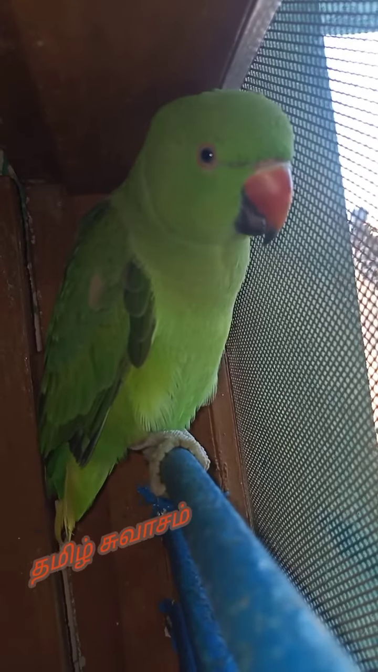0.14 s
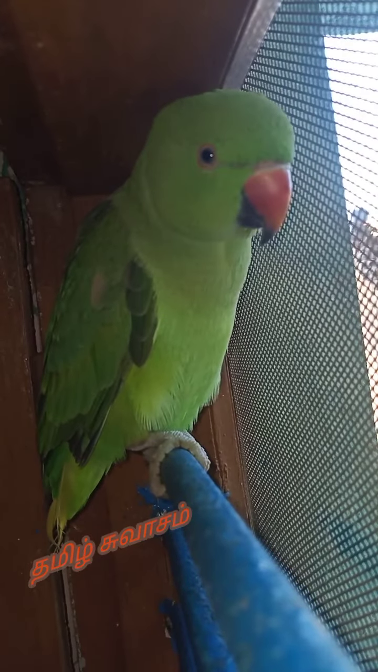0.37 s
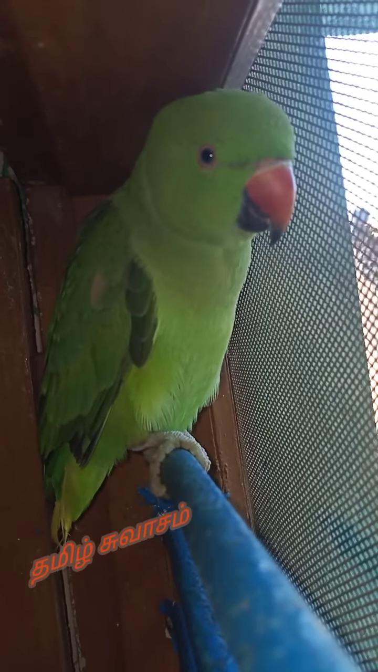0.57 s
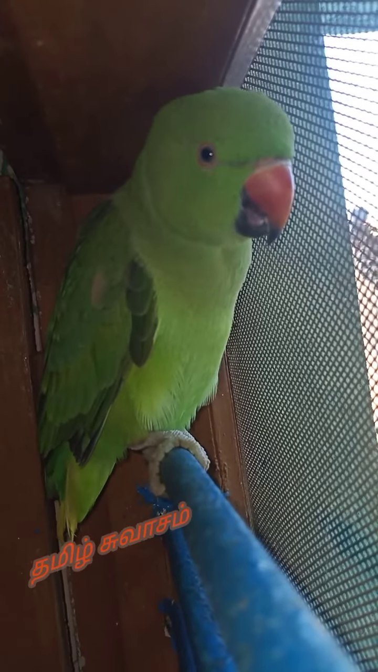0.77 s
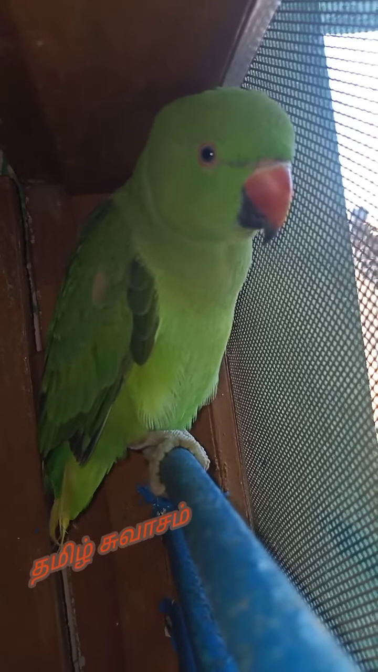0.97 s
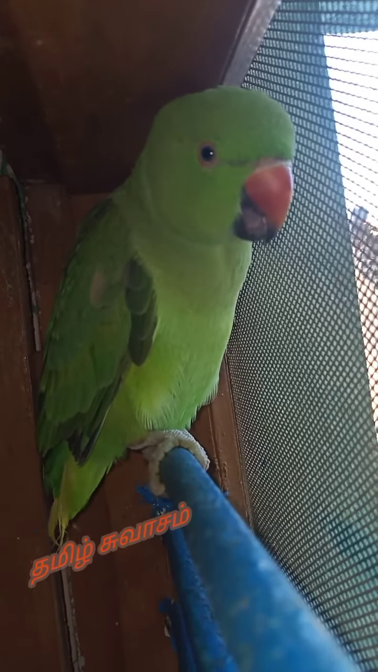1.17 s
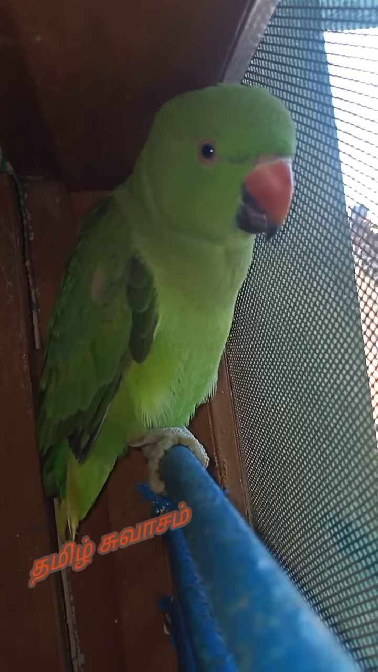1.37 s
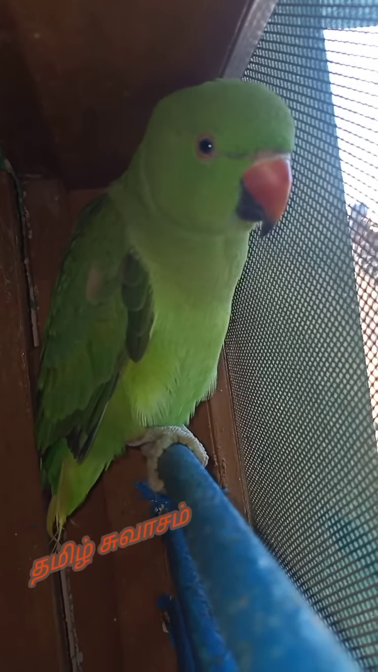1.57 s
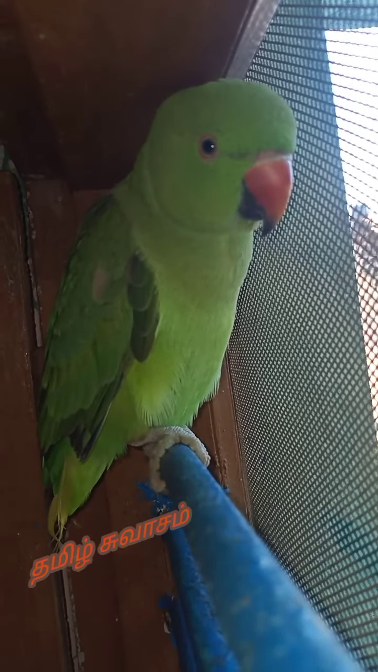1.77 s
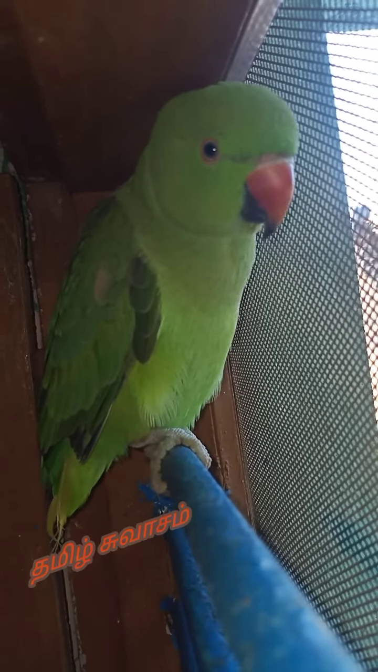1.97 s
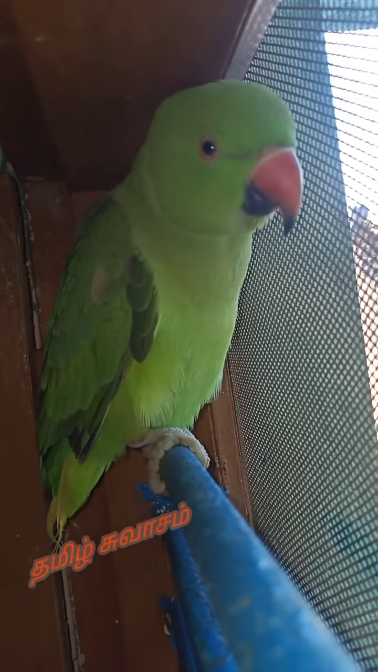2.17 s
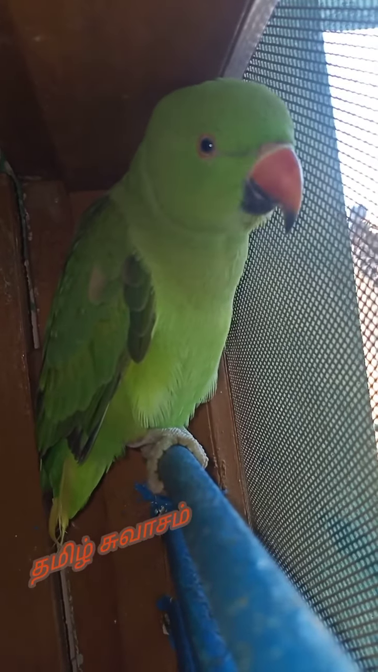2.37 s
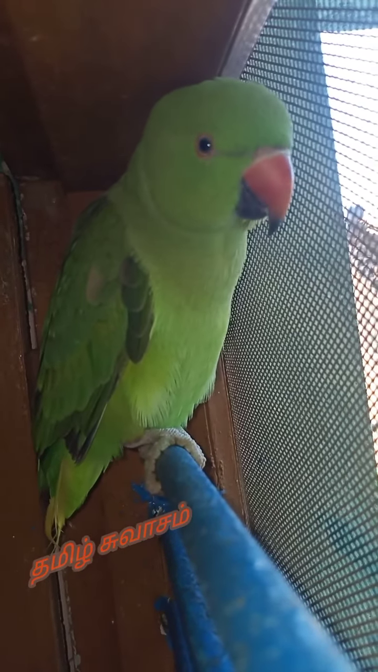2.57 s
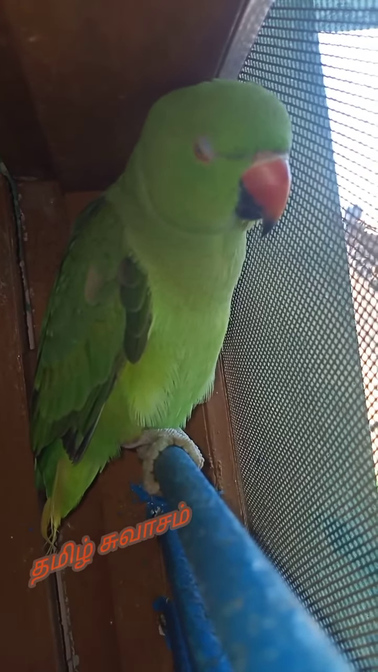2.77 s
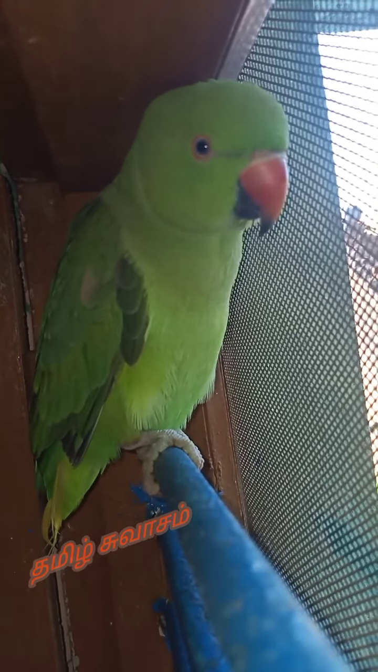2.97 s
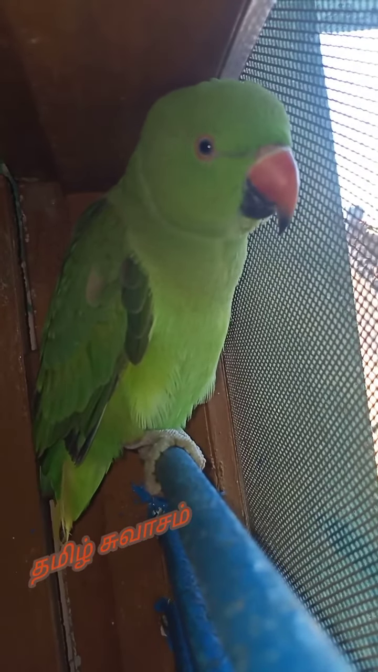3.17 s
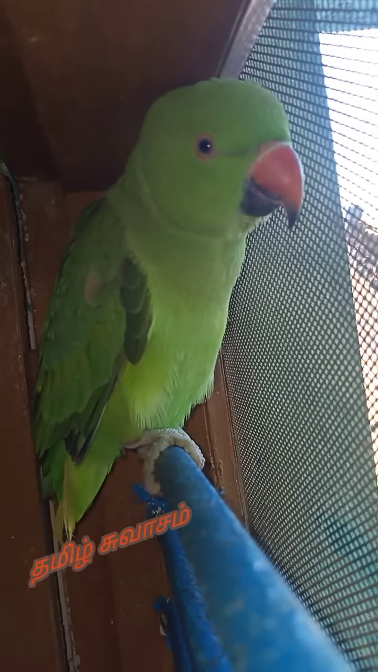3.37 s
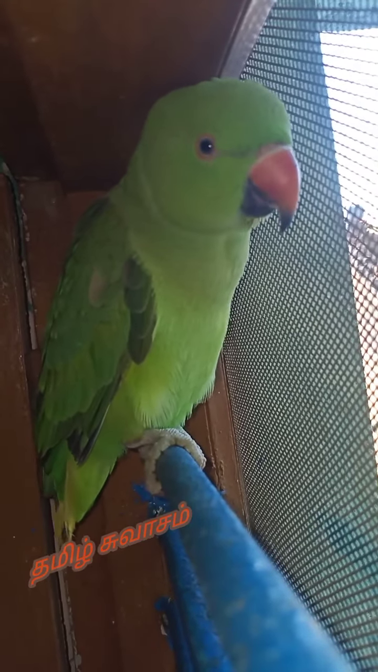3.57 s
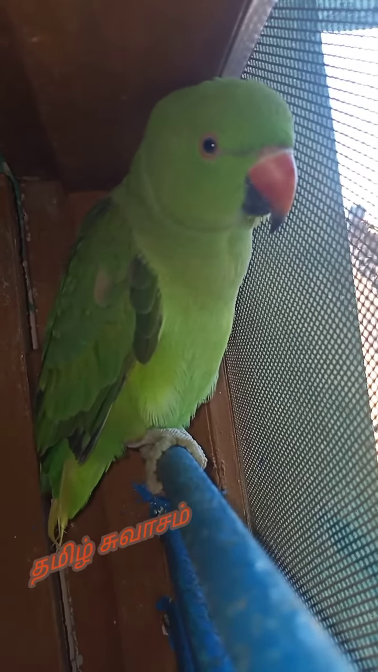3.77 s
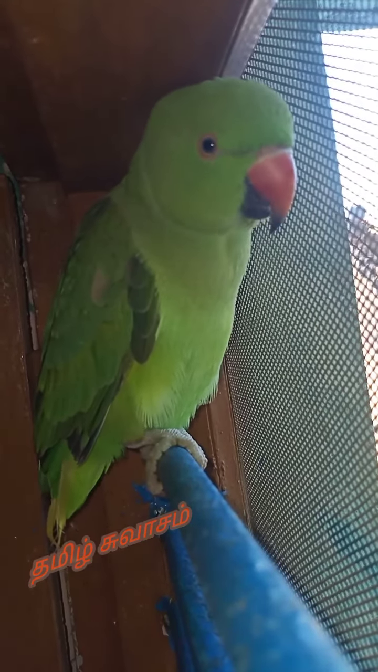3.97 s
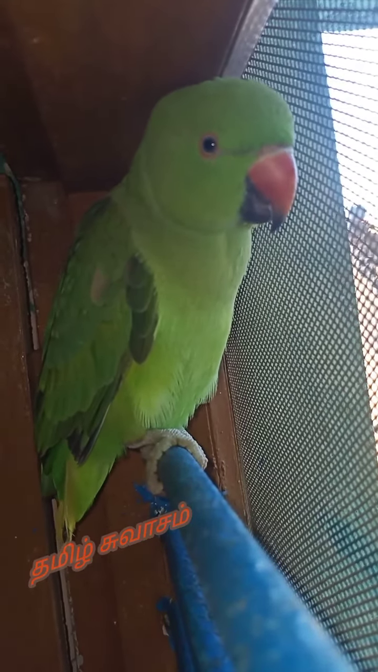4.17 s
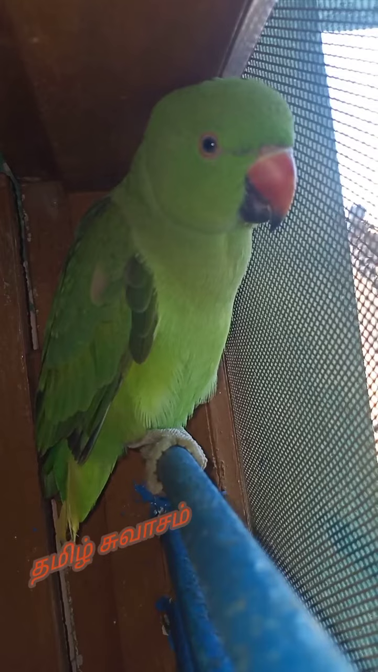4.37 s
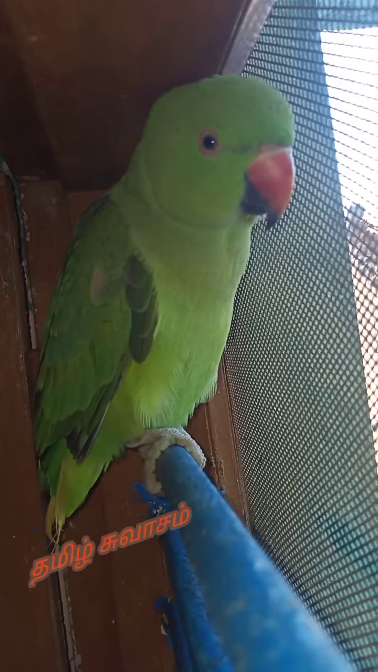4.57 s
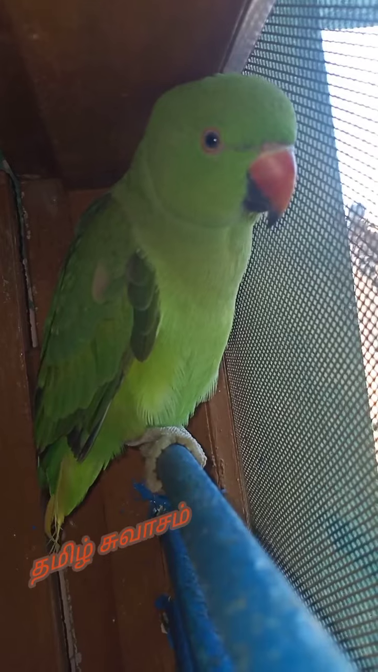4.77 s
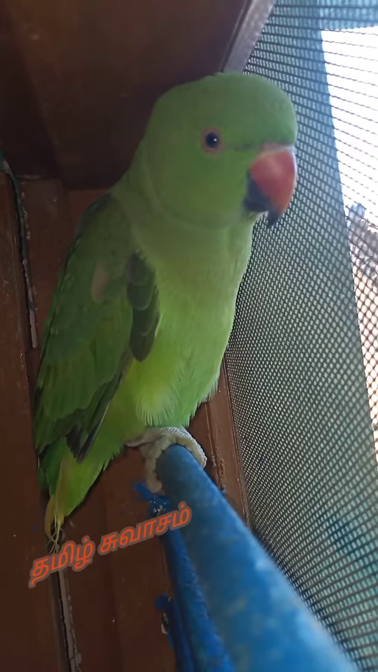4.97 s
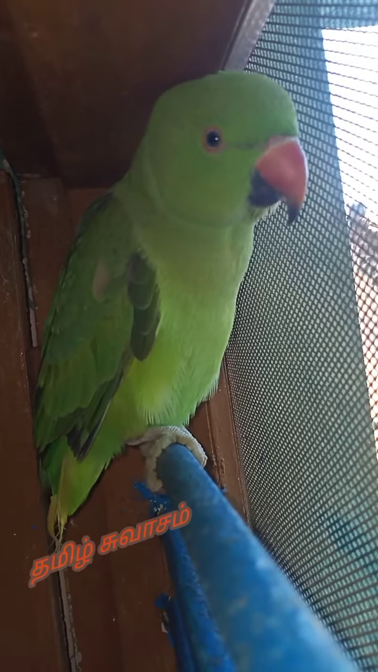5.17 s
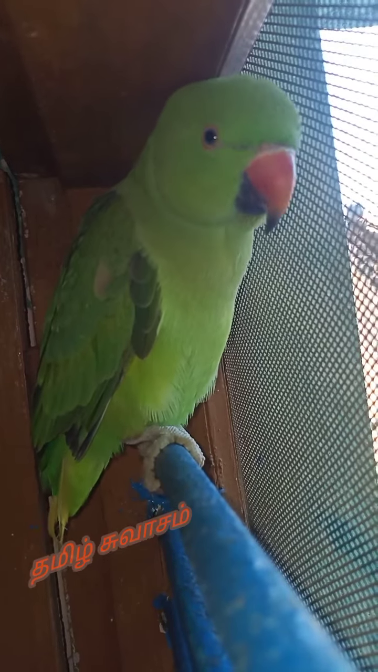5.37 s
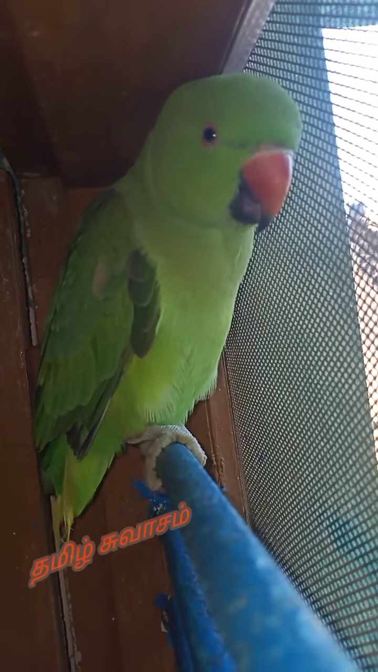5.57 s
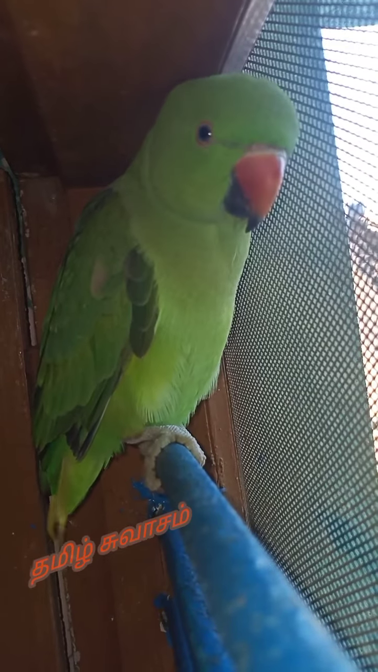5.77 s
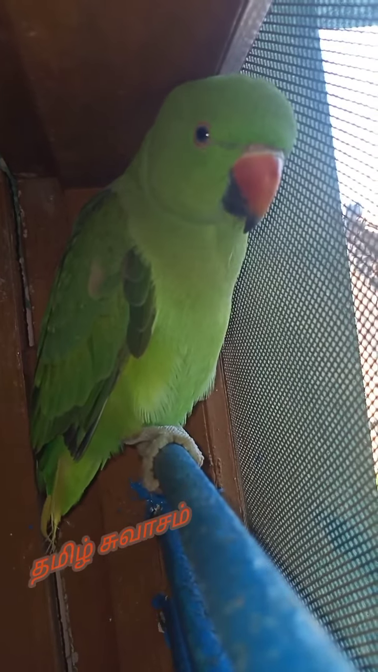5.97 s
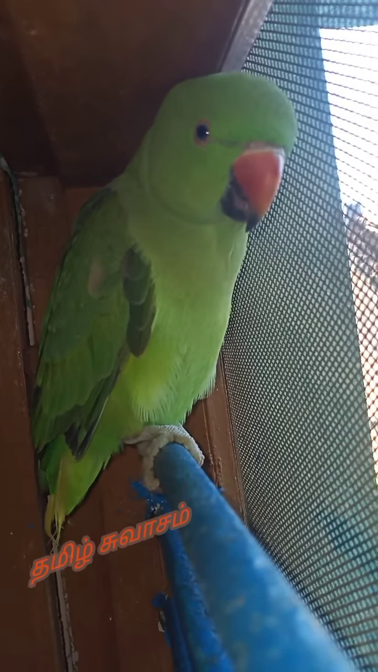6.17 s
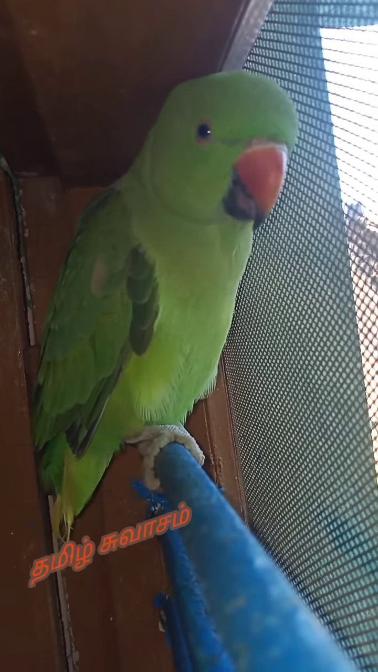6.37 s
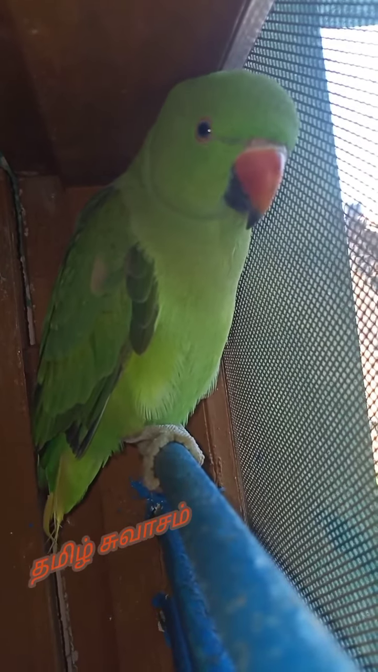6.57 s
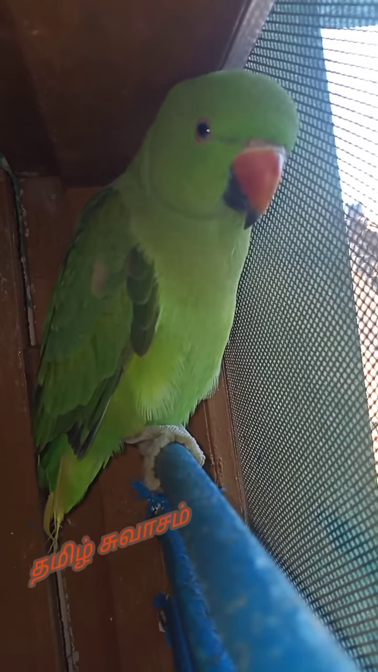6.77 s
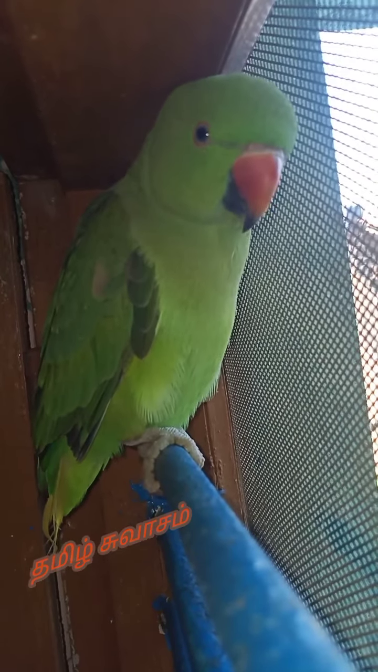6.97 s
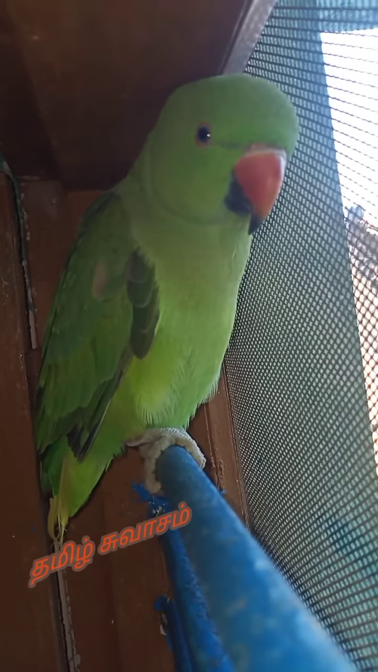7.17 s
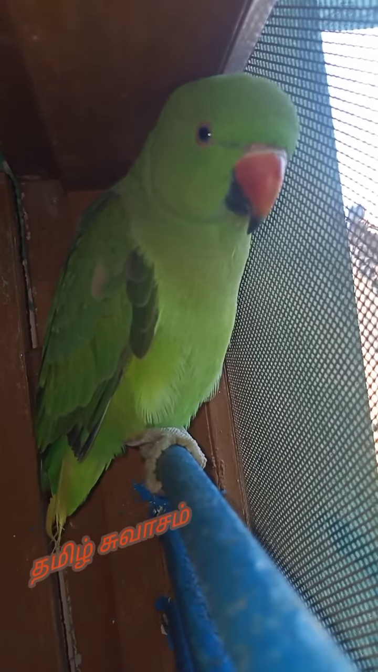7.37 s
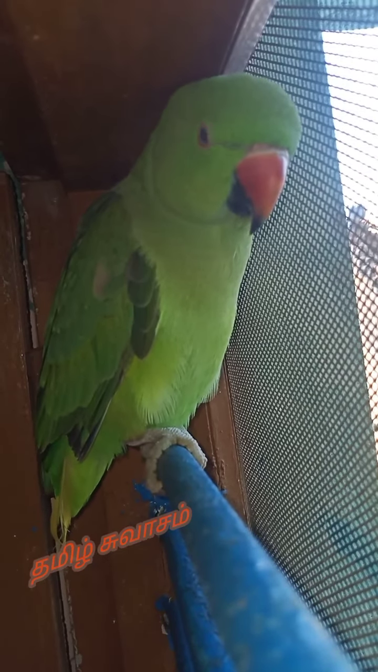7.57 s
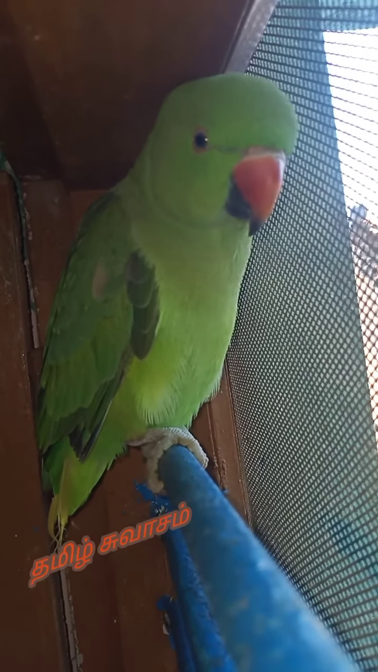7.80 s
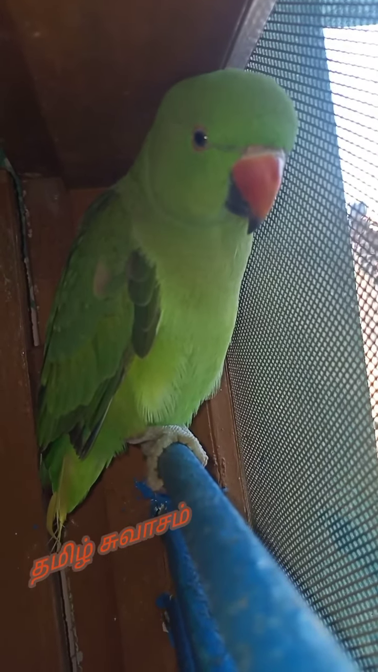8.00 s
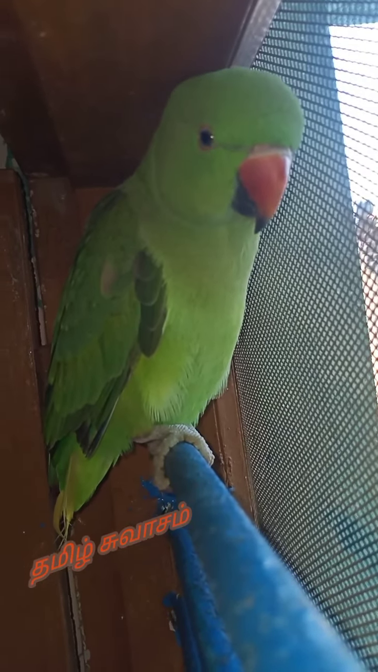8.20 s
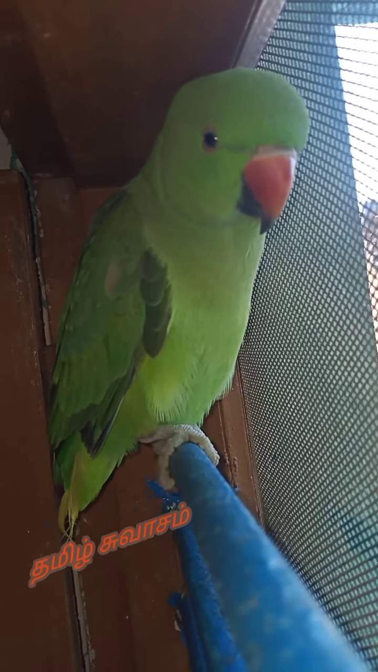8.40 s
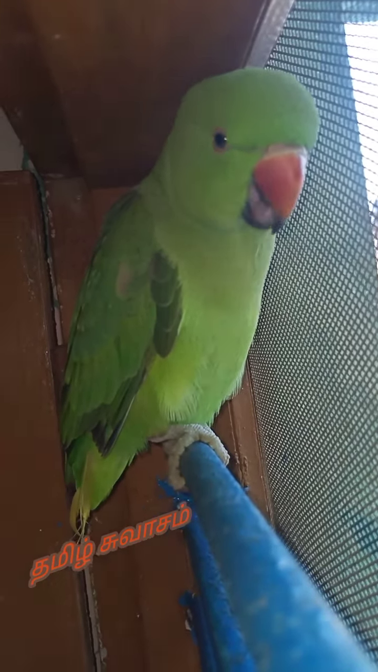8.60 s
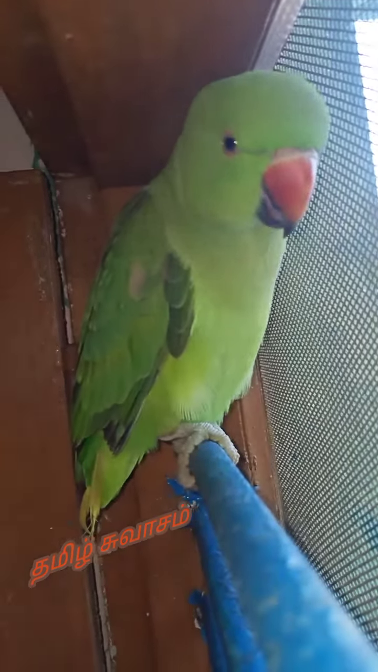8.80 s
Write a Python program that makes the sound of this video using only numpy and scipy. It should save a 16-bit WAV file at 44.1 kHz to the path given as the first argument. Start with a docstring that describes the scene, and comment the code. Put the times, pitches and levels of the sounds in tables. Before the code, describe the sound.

Close, bright parakeet calls in a small wooden cage: squeals, quiet clucks, sharp chirps, a nasal squawk and a tiny rattle, with pauses between.

```python
"""A parakeet in a wooden cage, close to the microphone: a peep, three gliding squeals, soft clucks, a thin whistle,
a warbling squeal, a cluck, loud falling chirps among peeps, a nasal squawk, and last a dry rattle of puffs.
Its syrinx is a gliding stack of harmonics, coloured by throat and call; cage walls and a small room answer.
Throughout: hiss, and far traffic as rumble and drone, strongest from 3 to 7 s. Two soft knocks, two faint
whistles of a far bird; near the end the high hiss swells once."""
import sys
import numpy as np
from scipy import signal
from scipy.fft import rfft, irfft, next_fast_len
from scipy.io import wavfile
from scipy.ndimage import uniform_filter1d

SR = 44100
rng = np.random.default_rng(int(sys.argv[2]) if len(sys.argv) > 2 else 0)


def transcribe(u):
    """Save the signal u as a 16-bit wav file named by the first command-line argument.

    u: samples, shape (n,) or (channels, n), limited to [-1, 1]; the rate is SR.
    q: integer samples, one column per channel.
    """
    v = np.clip(np.atleast_2d(u).T, -1, 1)
    q = np.round(v * 32767).astype(np.int16)
    wavfile.write(sys.argv[1], SR, q)


N = 389844
EDGE_HZ = 15600  # upper band limit of voice and recorder

# Pitch and effort of the long calls: (time [s], pitch [Hz], level [dB])
SMALL_ARCH = [(0.066, 1715, -40), (0.126, 1750, -33.5), (0.188, 1550, -32), (0.216, 1106, -34),
              (0.238, 647, -45)]
WIDE_ARCH = [(0.557, 774, -41), (0.58, 799, -40.5), (0.625, 1013, -33.5), (0.648, 1093, -42.5),
             (0.67, 1185, -36.5), (0.716, 1542, -32.5), (0.759, 1660, -45), (0.782, 1655, -22),
             (0.806, 1625, -28.5), (0.84, 1544, -13), (0.866, 1380, -26.5), (0.882, 1228, -18.5),
             (0.91, 1020, -21), (0.932, 820, -38.5)]
LONG_FALL = [(1.222, 2225, -23), (1.24, 2031, -24.5), (1.288, 1903, -15.5), (1.306, 1774, -19),
             (1.342, 1582, -23), (1.362, 1586, -22.5), (1.384, 1536, -14.5), (1.41, 1333, -29.5),
             (1.43, 1248, -18.5), (1.454, 992, -17.5), (1.477, 999, -25)]
WARBLE = [(4.028, 1262, -32), (4.044, 1190, -37), (4.104, 1246, -30.5), (4.138, 1397, -40),
          (4.172, 1616, -26.5), (4.226, 1589, -24.5), (4.3, 1300, -39.5), (4.322, 1260, -29.5),
          (4.358, 1334, -33.5), (4.408, 1643, -22.5), (4.432, 1800, -29)]
WHISTLE = [(3.097, 1960, -42.5), (3.125, 1863, -36), (3.165, 1738, -34.5), (3.22, 1706, -39),
           (3.27, 1749, -37), (3.305, 1728, -42), (3.335, 1670, -39.5), (3.378, 1374, -34),
           (3.404, 1392, -39), (3.425, 1263, -40.5), (3.452, 1093, -42.5), (3.505, 1198, -34.5),
           (3.535, 1428, -27), (3.561, 1660, -36), (3.594, 1866, -46.5)]
SQUAWK = [(7.118, 838, -44), (7.136, 830, -36.5), (7.151, 843, -36.5), (7.16, 758, -31.5),
          (7.186, 786, -35), (7.203, 664, -47)]
# Resonances and colouring of the overtones, named for the kind of call or pose of the beak they go with:
# (centre [Hz], half width [Hz], gain [dB])
OPEN_BEAK = [(2988, 230, 8.5), (4400, 330, -10), (15030, 900, 18.5)]
WARBLE_BEAK = [(6402, 93, 14), (7980, 230, 12), (11100, 200, 17.5)]
CLOSED_BEAK = [(1372, 142, 16.5), (7086, 595, 24.5), (10700, 1670, 20)]
NASAL_COLOUR = [(1485, 110, 5), (3780, 120, 9), (7260, 510, 22), (9840, 1000, 33.5)]
CLUCK_COLOUR = [(1387, 142, 19), (3780, 1100, -28), (6650, 470, 31.5)]
# Open-beaked squeals: (curve, overtones [dB], overtone tilt [dB/octave],
# extra tilt at the start [dB/octave], closing rasp [0-1], colouring)
SQUEALS = [(SMALL_ARCH, 0.54, -12.5, -34, 0.98, OPEN_BEAK), (WIDE_ARCH, 8.8, -9, 0, 0.45, OPEN_BEAK),
           (LONG_FALL, 7.6, -5.5, 0, 0.22, OPEN_BEAK), (WARBLE, 3.6, -6.5, -39.5, 0.085, WARBLE_BEAK)]
# Falling chirps: (time [s], length [s], first pitch [Hz], lowest pitch [Hz], steepest after [s], glide [s],
# lowest after [s], attack [s], release [s], level [dB], overtones [dB], tilt [dB/octave])
CHIRPS = [(5.598, 0.072, 2390, 1604, 0.029, 0.043, 0.055, 0.005, 0.033, -16, 5.5, -4),
          (5.874, 0.086, 2394, 1408, 0.045, .022, 0.09, 0.0086, 0.052, -14, 6, -3.5),
          (6.096, 0.105, 2384, 1430, 0.084, 0.18, 0.104, 0.0035, 0.012, -18.5, 0.5, 1.5),
          (6.378, 0.094, 2355, 1676, 0.044, 0.044, 0.073, 0.005, 0.012, -16.5, -1, 2.5)]
# Cage peaks and dips where the bird chirps: (centre [Hz], half width [Hz], gain [dB])
CHIRP_CAGE = [(2770, 110, -13.5), (3990, 140, 6), (4230, 81, -4), (4560, 46, -8.5), (6260, 180, -12)]
# Steady peeps: (time [s], length [s], pitch [Hz], level [dB], overtones [dB], tilt [dB/octave],
# loudest after [s])
PEEPS = [(0.001, 0.036, 1529, -31.5, -4, -17.5, 0.00087), (5.321, 0.051, 2632, -19, -3, -3.5, 0.039),
         (6.345, 0.035, 3594, -14.5, -3.5, -7, 0.017)]
# Soft clucks: (time [s], length [s], first pitch [Hz], last pitch [Hz], level [dB], overtones [dB],
# tilt [dB/octave])
CLUCKS = [(2.316, 0.048, 426, 432, -46, 0.5, -25), (2.391, 0.039, 578, 526, -37, -7, -10),
          (2.502, 0.0165, 484, 420, -48.5, -4.5, -19.5), (5.106, 0.029, 671, 460, -38.5, -8, -16.5)]
# Puffs of the closing rattle: (time [s], level [dB], overtone tilt [dB/octave])
RATTLE = [(7.572, -51, -30), (7.585, -37.5, -30), (7.5963, -36, -24), (7.6092, -34, -18), (7.622, -37, -25),
          (7.6371, -39, -19), (7.649, -34, -11), (7.6631, -34, -12), (7.679, -43, -12), (7.691, -36.5, -5),
          (7.7038, -48.5, 0)]
# Throat response: (frequency [Hz], gain [dB])
THROAT = [(800, -10), (1300, 2.5), (2000, -3), (2400, 9), (2750, 0.5), (3100, 6.5), (3500, 3.5), (3900, 4),
          (4450, 3.5), (5300, 5.5), (5900, -1), (6450, 5.5), (9300, -6.5), (10200, -21), (15500, -27.5)]
# Reflections in cage and room: (frequency [Hz], decay time before scaling [s], relative gain [dB])
ROOM = [(500, 0.05, 8), (2173, 0.31, -6.5), (4486, 0.3, -2.5), (6140, 0.25, -3.5), (6260, 0.096, -10.5),
        (8500, 0.19, -5.5), (12000, 0.27, -7.5)]
# Soft knocks of the hand on the microphone: (time [s], level [dB])
KNOCKS = [(0.734, -46), (7.765, -53.5)]
# Whistles of a far bird: (time [s], length [s], level [dB])
FAR_WHISTLES = [(2.279, 0.3, -67), (6.89, 0.14, -68.5)]
# Hiss spectrum shape: (frequency [Hz], relative density [dB])
HISS = [(18, -51.5), (30, -20), (130, -4), (202, -5.5), (399, -7.5), (455, -13), (874, -10), (2620, -16),
        (8720, -19), (12600, -45.5), (15500, -33.5)]
# Swells in the high hiss: (time [s], length [s], level [dB])
HISS_SWELLS = [(8.448, 1, -73)]
# Far traffic: (time [s], rumble level [dB], engine drone level [dB])
TRAFFIC = [(3.1, -89, -89), (3.4, -70.5, -65.5), (3.8, -70.5, -78), (4.198, -63.5, -95.5),
           (5.151, -73, -79.5), (5.399, -78, -56.5), (5.95, -72, -58), (6.099, -66.5, -68.5),
           (7, -80.5, -82)]


def squeals(base_rough=0.056, rasp_s=0.052, rasp_rise_s=0.022, rasp_tilt_db=1, warm_up_s=0.043):
    """Long gliding calls: a dull onset finds its colour, then the end turns rough and bright."""
    for curve, overtones_db, tilt_db, dull_db, closing_rasp, colouring in SQUEALS:
        t, hz, db = trace(curve)
        rasp = closing_rasp * np.clip((t - t[-1] + rasp_s) / rasp_rise_s, 0, 1)
        onset_tilt_db = dull_db * np.exp((t[0] - t) / warm_up_s)
        tilt = tilt_db + onset_tilt_db + rasp_tilt_db * rasp
        yield call(t, hz, db, overtones_db, tilt, base_rough + rasp, colouring)


def chirps(opening_db=8, fade_db=15.5, start_rough=0.07, end_rough=0.16, rebound_hz_per_s=4500):
    """Loud short calls: an S-curve down in pitch; overtones grow and cross the cage's resonances."""
    for (s, length_s, first_hz, lowest_hz, steepest_s, glide_s, turn_s,
         attack_s, release_s, db, overtones_db, tilt_db) in CHIRPS:
        t = np.arange(0, length_s, 1 / SR)
        slide = np.tanh((np.minimum(t, turn_s) - steepest_s) / glide_s)
        fallen = (slide - slide[0]) / (slide[-1] - slide[0])
        hz = first_hz + (lowest_hz - first_hz) * fallen
        hz += rebound_hz_per_s * np.maximum(t - turn_s, 0)  # pitch turns up past its lowest point
        edges = np.minimum(t / attack_s, (length_s - t) / release_s)
        level_db = db - fade_db * np.clip(1 - edges, 0, 1)
        rough = start_rough + (end_rough - start_rough) * fallen
        start, sound = call(s + t, hz, level_db, overtones_db + opening_db * (fallen - .5), tilt_db, rough)
        yield start, coloured(sound, CHIRP_CAGE)


def peeps(rough=0.11, ends_db=-13.5):
    """Short notes on one pitch that swell and fade."""
    for s, length_s, hz, db, overtones_db, tilt_db, loudest_s in PEEPS:
        t = np.arange(0, length_s, 1 / SR)
        level_db = db + np.interp(t, (0, loudest_s, length_s), (ends_db, 0, ends_db))
        yield call(s + t, hz, level_db, overtones_db, tilt_db, rough)


def clucks(rough=0.24, settle_s=0.0102, fade_db_per_s=303):
    """Low notes with the beak nearly shut: the pitch settles quickly while the sound dies."""
    for s, length_s, first_hz, last_hz, db, overtones_db, tilt_db in CLUCKS:
        t = np.arange(0, length_s, 1 / SR)
        hz = last_hz + (first_hz - last_hz) * np.exp(-t / settle_s)
        level_db = db - fade_db_per_s * t
        yield call(s + t, hz, level_db, overtones_db, tilt_db, rough, CLUCK_COLOUR, edge_s=0.019)


def whistle(thin_db=-29, full_db=-11, thin_tilt_db=6, full_tilt_db=-44, fill_s=3.324, fill_width_s=0.078,
            flare_s=3.544, flare_width_s=0.011, flare_tilt_db=30, rough=0.02, flare_rough=0.13):
    """Thin, almost pure tone through the shut beak; fills out in its dip, flares hoarse in the final rise."""
    t, hz, db = trace(WHISTLE)
    full = (1 + np.tanh((t - fill_s) / fill_width_s)) / 2
    flare = (1 + np.tanh((t - flare_s) / flare_width_s)) / 2
    overtones_db = thin_db + (full_db - thin_db) * full
    tilt_db = thin_tilt_db + (full_tilt_db - thin_tilt_db) * full + flare_tilt_db * flare
    return call(t, hz, db, overtones_db, tilt_db, rough + flare_rough * flare, CLOSED_BEAK)


def squawk(overtones_db=-13, tilt_db=-5, peak_rough=0.16):
    """One short nasal note of falling pitch, hoarsest where it is loudest."""
    t, hz, db = trace(SQUAWK)
    rough = peak_rough * np.sqrt(amp(db - db.max()))
    return call(t, hz, db, overtones_db, tilt_db, rough, NASAL_COLOUR)


def rattle(hz=1280, overtones_db=-5, half_length_s=.0026, fade_db=11, rough=0.32):
    """The syrinx opens in short puffs of a few cycles; the late ones are the crispest."""
    rim = np.array([-1, 0, 1])
    for s, db, tilt_db in RATTLE:
        t = s + half_length_s * rim
        level_db = db - fade_db * abs(rim)
        yield call(t, hz, level_db, overtones_db, tilt_db, rough, CLOSED_BEAK, edge_s=0.0009)


def trace(curve):
    """Time, pitch and level along a call's curve."""
    s, hz, db = np.transpose(curve)
    t = np.arange(s[0], s[-1], 1 / SR)
    return t, np.interp(t, s, hz), np.interp(t, s, db)


def call(t, hz, level_db, overtones_db, tilt_db, rough, colouring=(), edge_s=0.0088,
         overtones_per_db=0.43, tilt_per_db=0.2046):
    """Start and sound of a call in the cage: less effort than the call's peak dulls the voice."""
    slack_db = level_db - np.max(level_db)
    overtones_db = overtones_db + overtones_per_db * slack_db
    tilt_db = tilt_db + tilt_per_db * slack_db
    controls = (t, hz, level_db, overtones_db, tilt_db, np.clip(rough, 0, 1))
    start, sound = syrinx(np.column_stack(np.broadcast_arrays(*controls)), colouring, edge_s)
    return start, near_walls(sound)


def syrinx(rows, colouring, edge_s, jitter=0.078, jitter_hz=480, shimmer=0.15, wobble=0.012, wobble_hz=70,
           half_db=-24, doubling_hz=1600, air_db=-1, top_loss_db=1.82):
    """Harmonics glide through throat and colouring; roughness shakes their pitch and size and adds air."""
    s, *columns = np.transpose(rows)
    t = np.arange(s[0] - edge_s * 0.65, s[-1] + edge_s * 1.2, 1 / SR)
    hz, level_db, overtones_db, tilt_db, rough = (np.interp(t, s, c) for c in columns)
    # muscles round each turn of pitch and tremble, more so in a rough voice
    hz = uniform_filter1d(hz, size=441, mode="nearest")
    hz *= 1 + wobble * np.sqrt(rough) * band(SR, 0, wobble_hz)[:len(t)]
    jittered_hz = hz * (1 + jitter * rough * band(SR, 0, jitter_hz)[:len(t)])
    phase = 2 * np.pi * np.cumsum(jittered_hz) / SR
    fundamental_gain = amp(read(THROAT, hz))
    fundamental = fundamental_gain * np.sin(phase)
    overtones, power = np.zeros(len(t)), fundamental_gain ** 2
    for k in range(2, 15):
        colour_db = sum(db * np.exp(-((k * hz - f) / width) ** 2) for f, width, db in colouring)
        source_db = overtones_db + tilt_db * np.log2(k / 2) - top_loss_db * (k - 1.5)
        size = amp(source_db + read(THROAT, k * hz) + colour_db + flicker(t))
        overtones += size * (k * hz < EDGE_HZ) * np.sin(k * phase)
        power += size ** 2
    # near one pitch alternate beats differ: faint lines between the harmonics
    doubling = np.exp(-((hz - doubling_hz) / 70) ** 2)
    overtones *= 1 + amp(half_db) * doubling * np.sin(phase / 2)
    # the swing starts as a pure tone; overtones follow once it is wide
    from_ends_s = np.minimum(t - t[0], t[-1] - t)
    swing = np.sin(np.pi / 2 * np.clip(from_ends_s / edge_s, 0, 1)) ** 2
    tone = swing * (fundamental + swing ** 2 * overtones) / np.sqrt(power / 2)
    tone += amp(air_db) * rough ** 2 * swing * noise(SR, air_colour)[:len(t)]
    shimmering = 1 + shimmer * rough * band(SR, 0, jitter_hz)[:len(t)]
    return t[0], tone * amp(level_db) * shimmering


def flicker(t, depth_db=3, rate_per_s=55):
    """Slow random level change [dB], drawn anew for each overtone."""
    return depth_db * np.interp((t - t[0]) * rate_per_s, np.arange(64), rng.standard_normal(64))


def air_colour(hz, centre_hz=2980, spread_octaves=0.61):
    """Gain of the rush of air: a broad hump, shaped by the throat."""
    return amp(read(THROAT, hz)) * np.exp(-(np.log2((hz + 1) / centre_hz) / spread_octaves) ** 2)


def near_walls(x, echo_db=-9, decay_s=0.0035):
    """First echoes off the cage walls, new for each call: gliding harmonics swell and dip in them."""
    t = np.arange(SR // 20) / SR
    echoes = rng.standard_normal(len(t)) * np.exp(-t / decay_s) * (t > .0008)
    response = amp(echo_db) * echoes / np.linalg.norm(echoes)
    response[0] = 1  # direct sound
    return signal.fftconvolve(x, response)


def coloured(x, bands):
    """Minimum-phase peaks and dips: they ring on after the sound that excites them."""
    size = next_fast_len(len(x) + SR // 20)
    f = abs(np.fft.fftfreq(size, 1 / SR))
    gain_db = sum(db * np.exp(-((f - hz) / width) ** 2) for hz, width, db in bands)
    response = np.exp(np.conj(signal.hilbert(np.log(amp(gain_db)))))
    return np.fft.ifft(np.fft.fft(x, size) * response).real


def space(x, cage_db=-18, room_db=-22):
    """Direct sound, a quick scatter in the cage and the room's tail."""
    cage = amp(cage_db) * tail(t60_scale=0.016, delay_s=0.007)
    room = amp(room_db) * tail(t60_scale=0.93, delay_s=0.018)
    return x + signal.fftconvolve(x, cage + room)[:N]


def tail(t60_scale, delay_s):
    """Sparse random reflections, each band dying at its own speed."""
    taps = rng.choice([-1., 1.], SR) * (rng.random(SR) < .1) * (np.arange(SR) > delay_s * SR)
    hz, t, z = signal.stft(taps, SR, nperseg=256)
    t60_s = t60_scale * read(ROOM, hz)[:, None]
    z *= amp(read(ROOM, hz, axis=2)[:, None] - 60 * t / t60_s)
    response = signal.istft(z, SR, nperseg=256)[1]
    return response / np.linalg.norm(response)


def knocks(hz=98, length_s=0.0042):
    """Soft low knocks of the hand on the microphone: sines in bell-shaped bursts."""
    out, t = np.zeros(N), np.arange(N) / SR
    for s, db in KNOCKS:
        burst = np.exp(-((t - s) / length_s) ** 2)
        out += amp(db) * burst * np.sin(2 * np.pi * hz * (t - s))
    return out


def far_bird(hz=2060, blur_hz=120):
    """Faint whistles, blurred by distance into narrow-band noise."""
    out = np.zeros(N)
    for s, length_s, db in FAR_WHISTLES:
        size = round(length_s * SR)
        add(out, s, amp(db) * band(size, hz, blur_hz) * signal.windows.tukey(size))
    return out


def traffic(drone_hz=141, wander_hz=3, growl_db=-3, growl_width_hz=42, rumble_hz=115, rumble_width_hz=48,
            lumpy_db=3, lumps_hz=5):
    """Far traffic: an uneven band of rumble and a wandering engine drone with a noisy growl."""
    s, *columns = np.transpose(TRAFFIC)
    rumble_db, drone_db = (np.interp(np.arange(N) / SR, s, c) for c in columns)
    wandering_hz = drone_hz + wander_hz * band(N, 0, 10.0)
    drone = np.sqrt(2) * np.sin(2 * np.pi * np.cumsum(wandering_hz) / SR)
    drone += amp(growl_db) * band(N, drone_hz, growl_width_hz)
    uneven_db = rumble_db + lumpy_db * band(N, 0, lumps_hz)
    return amp(uneven_db) * band(N, rumble_hz, rumble_width_hz) + amp(drone_db) * drone


def hiss(level_db=-68, early_db=-4, settled_s=2.2):
    """Shaped noise that comes up to a steady level."""
    early = np.clip(1 - np.arange(N) / SR / settled_s, 0, 1)
    return amp(level_db + early_db * early) * noise(N, lambda f: amp(read(HISS, f)))


def high_hiss(hz=8200, width_hz=1100):
    """A band of noise: the top of the hiss swells."""
    out = np.zeros(N)
    for s, length_s, db in HISS_SWELLS:
        size = round(length_s * SR)
        add(out, s, amp(db) * band(SR, hz, width_hz)[:size] * signal.windows.tukey(size))
    return out


def amp(db):
    """Decibels to gain."""
    return 10 ** (np.asarray(db) / 20)


def unit(x):
    """Scales to rms 1."""
    return x / np.sqrt(np.mean(x ** 2) + 1e-20)


def read(points, hz, axis=1):
    """One column of a spectrum table, on a log-frequency axis."""
    table = np.transpose(points)
    return np.interp(np.log(hz + 1), np.log(table[0]), table[axis])


def add(mix, s, sound):
    """Mixes a sound in at time s [s]."""
    part = mix[max(round(s * SR), 0):][:len(sound)]
    part += sound[:len(part)]


def noise(size, colour):
    """Noise of rms 1 whose spectrum has the gain colour(Hz)."""
    spectrum = rfft(rng.standard_normal(size)) * colour(np.fft.rfftfreq(size, 1 / SR))
    return unit(irfft(spectrum, size))


def band(size, hz, width_hz):
    """Noise of rms 1 in one bell-shaped band."""
    return noise(size, lambda f: np.exp(-((f - hz) / width_hz) ** 2))


def scene():
    """The bird in its cage, over the background."""
    bird = np.zeros(N)
    calls = [*squeals(), *chirps(), *peeps(), *clucks(), whistle(), squawk(), *rattle()]
    for start, sound in calls:
        add(bird, start, sound)
    return (space(bird) + knocks() + far_bird() + traffic() + hiss() + high_hiss())[None]


def record(dry):
    """The recorder's band limit: a steep low-pass."""
    lowpass = signal.firwin(511, EDGE_HZ, window=("kaiser", 9), fs=SR)
    return signal.oaconvolve(dry, lowpass[None], "same")


dry = scene()
out = record(dry)
transcribe(out)
```